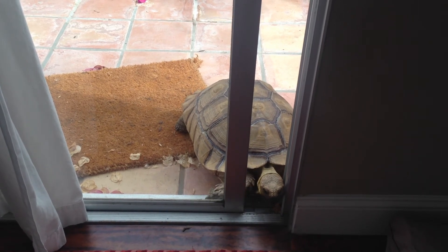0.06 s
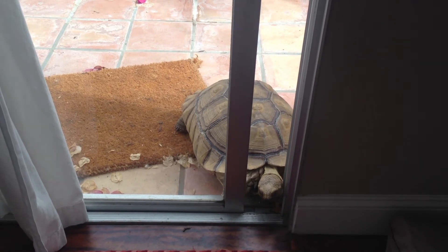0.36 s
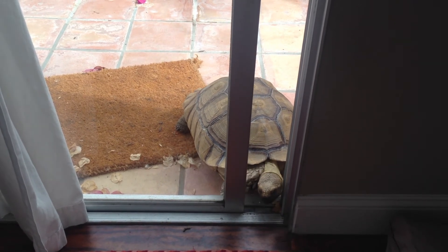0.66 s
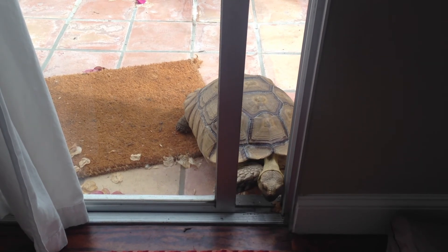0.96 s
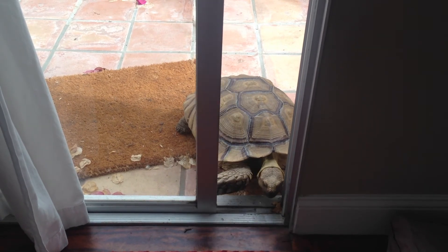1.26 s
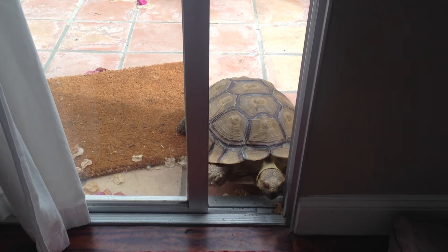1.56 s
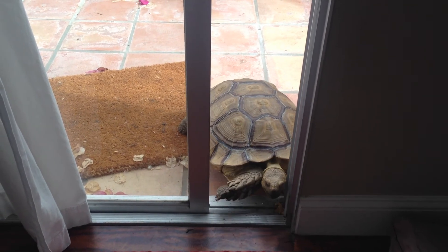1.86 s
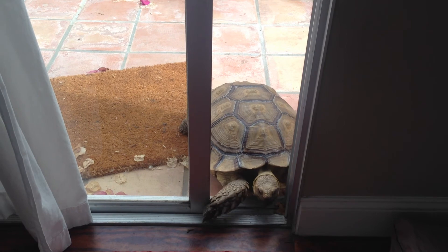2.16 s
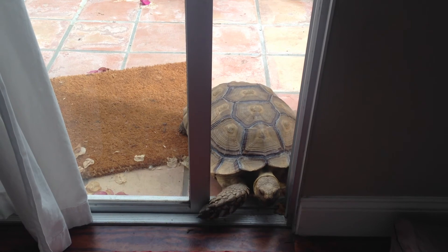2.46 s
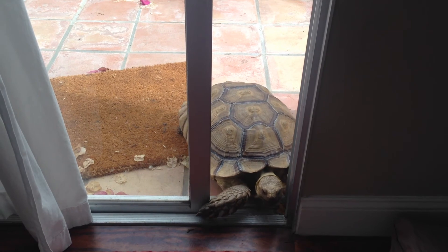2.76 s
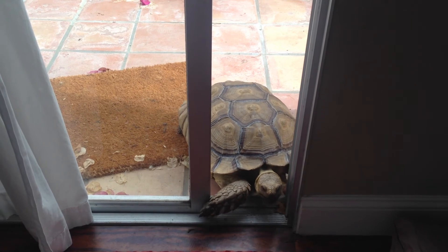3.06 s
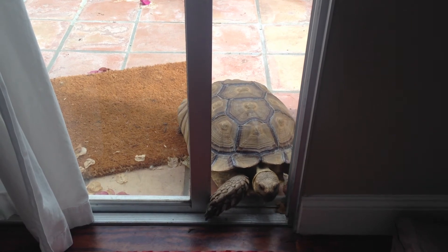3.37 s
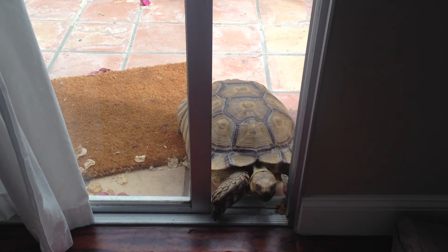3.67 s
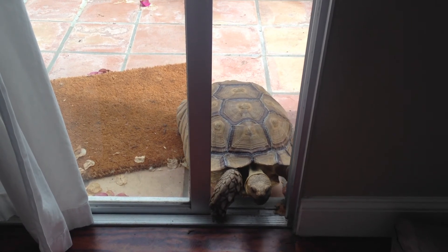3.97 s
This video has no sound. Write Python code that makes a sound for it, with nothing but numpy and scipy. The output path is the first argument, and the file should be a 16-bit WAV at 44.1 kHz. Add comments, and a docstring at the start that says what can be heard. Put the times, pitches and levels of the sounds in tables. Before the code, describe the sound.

A tortoise shoves through a sliding door, heard from a quiet room. Its claws scrape and click on the sill for the first half second. Soft shell thumps and rubbing follow as the door slides, with one faint bird chirp near 0.8 seconds. A sharp knock comes at 2 seconds. Around 3.3 seconds the metal frame briefly groans and clatters loudly, then light bumps and rubs continue until 4 seconds.

```python
"""A tortoise shoves through the gap of a sliding patio door, heard from the quiet room inside.
First its claws scrape and click on the sill. Its shell then thumps the panel and rubs along as the
door slides, and a bird chirps once outside. At two seconds the shell knocks the sill; near three the
claw tips tap it. The metal frame then sticks, groans and clatters against its track, and a last few
bumps and rubs follow."""
import sys
import numpy as np
from scipy import signal
from scipy.fft import rfft, irfft, next_fast_len
from scipy.io import wavfile
from scipy.ndimage import uniform_filter1d

SR = 44100
rng = np.random.default_rng(int(sys.argv[2]) if len(sys.argv) > 2 else 0)


def log_audio(samples):
    """Write samples as a 16-bit WAV file to the path given in sys.argv[1]."""
    # one column per channel
    frames = np.atleast_2d(samples).T
    # limit to full scale, then quantise
    limited = np.clip(frames, -1, 1)
    pcm = np.round(limited * 32767).astype(np.int16)
    wavfile.write(sys.argv[1], SR, pcm)


N = 176400
T = np.arange(N) / SR
HIT_T = T[:SR // 2]  # time axis of one impact

# Bumps of shell and feet. Each row: start in seconds, level in dB, pitch in Hz, rise time in seconds,
# tick level in dB.
PANEL_BUMPS = [(0.287, -48.5, 236, 0.0022, -52.5), (0.311, -51, 161, 0.0063, -58.5),
               (.38, -55.5, 180, 0.0092, -56), (0.593, -55.5, 238, 0.003, -57.5),
               (0.635, -54.5, 239, 0.02, -66), (1.026, -57, 230, 0.0017, -56),
               (1.171, -58.5, 237, 0.0027, -63), (1.376, -53, 173, .012, -70),
               (1.474, -42.5, 222, 0.0014, -49), (1.737, -50, 257, 0.0048, -62.5),
               (1.757, -52, 191, 0.0061, -66), (2.085, -45, 183, 0.0055, -53),
               (2.109, -50.5, 210, 0.0059, -55), (2.254, -39, 172, .013, -63.5),
               (3.23, -45, 168, 0.0043, -78), (3.265, -45, 170, 0.024, -57),
               (3.306, -29.5, 174.7, 0.0086, -63), (3.574, -56, 178, 0.0057, -66),
               (3.951, -50, 165.5, 0.03, -59)]
# Panel modes. Each row: ratio to the pitch, level in dB, decay time in seconds.
PANEL_MODES = [(.73, -8.5, 0.09), (1, 7.5, 0.049), (1.42, -24, 0.14), (2.1, -1, 0.025)]
# Contact tick. Each row: frequency in Hz, gain in dB.
TICK_SPECTRUM = [(80, -17.5), (200, -10.5), (450, 6.5), (750, 2), (1300, 3.5), (4500, -4), (9000, -23.5)]
def panel_bumps():
    """Soft impact: the panel's low modes swell as the push builds, and the contact adds a dull tick."""
    out = np.zeros(N)
    for start, db, hz, rise_s, tick_db in PANEL_BUMPS:
        swell = 1 - np.exp(-(HIT_T / rise_s) ** 2)
        boom = unit(ring(PANEL_MODES, hz) * swell)
        tick = unit(colour(burst(decay_s=.098) * swell, TICK_SPECTRUM))
        add(out, start, amp(db) * boom + amp(tick_db) * tick)
    return out


# Claw slips. Each row: start in seconds, level in dB, pitch in Hz, nominal decay time in seconds.
CLAW_SNAPS = [(0.1743, -58, 4200, 0.012), (0.189, -53.5, 5100, 0.11), (0.278, -39.5, 4870, 0.0083),
              (0.2852, -34, 4500, 0.0083), (.2858, -37.5, 2830, 0.0058), (.2853, -44.5, 1750, 0.007),
              (0.2935, -43.5, 3000, 0.018), (.368, -52.5, 5070, 0.31), (0.402, -51, 4250, 0.018),
              (2.187, -62.5, 4500, 0.019)]
def claw_snaps():
    """Resonance: a claw slipping off the metal edge excites a narrow band, a pitched snap or rasp."""
    out = np.zeros(N)
    for start, db, hz, decay_s in CLAW_SNAPS:
        b, a = signal.iirpeak(hz, Q=2.8, fs=SR)
        slip = signal.lfilter(b, a, signal.lfilter(b, a, burst(decay_s)))
        add(out, start, amp(db) * unit(pass_band(slip, "low", hz=6800, order=3)))
    return out


# Claw strokes. Each row: start in seconds, level in dB, length in seconds.
CLAW_STROKES = [(0.048, -45.5, 0.0034), (0.05, -47.5, 0.041), (.076, -44.5, 0.024), (0.084, -49, 0.0063),
                (0.1214, -42.5, 0.048)]
# Claw on grit. Each row: frequency in Hz, gain in dB.
SCRAPE_SPECTRUM = [(100, -31), (420, -15), (620, 3), (1800, 0.5), (3800, 5), (4800, -4.5), (7500, -5.5),
                   (15000, -28.5)]
def claw_scrapes():
    """Stick-slip friction: each stroke of a claw over grit releases a fading train of clicks."""
    out = np.zeros(N)
    for start, db, length_s in CLAW_STROKES:
        stroke = grit(len(HIT_T)) * np.exp(-(HIT_T / length_s) ** 2)
        add(out, start, amp(db) * unit(colour(stroke, SCRAPE_SPECTRUM)))
    return out


# Shell knock and claw taps. Each row: start in seconds, level before filtering in dB.
SHELL_KNOCKS = [(2.0664, -34)]
CLAW_TAPS = [(2.9896, -69), (3.0093, -68), (3.017, -62), (3.0648, -65)]
# Sill modes. Each row: frequency in Hz, level in dB, decay time in seconds.
SILL_MODES = [(830, 3, .035), (1076, -1, .035), (1850, -1, .028), (3270, -10, .1), (5560, 1, .008)]
# Crack of the sill. Each row: frequency in Hz, gain in dB.
SILL_SPECTRUM = [(150, -14), (450, -7.5), (850, -10.5), (1300, -8), (2700, -5.5), (4000, 2), (5700, 4),
                 (9000, -4), (15000, -20)]
def sill_strikes():
    """Impact excitation: the shell sounds the whole sill; light claw tips raise only its treble."""
    knocks, taps = (blows(strikes, SILL_MODES, SILL_SPECTRUM, crack_db=2.5, crack_s=.019)
                    for strikes in (SHELL_KNOCKS, CLAW_TAPS))
    return knocks + pass_band(taps, "high", hz=4500)


# Bounces on the track. Each row: start in seconds, level in dB.
FRAME_BOUNCES = [(3.2882, -26.5), (3.2932, -18), (3.3005, -17.5), (3.3112, -21.5)]
# Crack of the frame. Each row: frequency in Hz, gain in dB.
FRAME_SPECTRUM = [(90, -23.5), (230, 4.5), (350, -6), (750, -4), (1600, -4.5), (1950, -3), (2750, 0.5),
                  (4200, -4), (6600, -5.5), (8500, -13), (15000, -33)]
# Modes of the metal frame. Each row: frequency in Hz, level in dB, decay time in seconds.
FRAME_MODES = [(1518, -2.5, 0.12), (2386, 0, .055), (2457, -2, 0.044), (2935, -2, 0.078), (2982, 0.5, 0.05),
               (3135, -7, 0.1), (6350, -12, 0.11), (6960, -6, 0.022)]
def frame_clatter():
    """Damped free vibration: the frame bounces on its track, then jams, which chokes its ring."""
    jam_s = 3.317
    choke = fade(t60=.028, hold_s=jam_s, t=T)
    return choke * blows(FRAME_BOUNCES, FRAME_MODES, FRAME_SPECTRUM, crack_db=-8.5, crack_s=.04)


def frame_resonance(contact):
    """Forced vibration: contact noise drives the frame's modes."""
    response = ring(FRAME_MODES, rattle_hz=20)
    return signal.fftconvolve(contact, response / np.linalg.norm(response))[:N]


# Groan of the door. Each row: time in seconds, pitch in Hz, level in dB.
GROAN_CURVE = [(3.214, 565, -59.5), (3.226, 504, -57), (3.265, 490, -75)]
# Grinding in the track. Each row: time in seconds, driving level in dB.
GRIND_CURVE = [(3.12, -73.5), (3.29, -71)]
# Grinding and rubbing noise. Each row: frequency in Hz, gain in dB.
RUB_SPECTRUM = [(60, -14.5), (180, 8), (330, -2.5), (550, 1.5), (1000, -4), (2000, -13.5), (3000, -9.5),
                (5000, -14), (15000, -29.5)]
def frame_sticking():
    """Frictional excitation: the sticking frame grinds in its track and groans at a falling pitch."""
    return frame_resonance(friction(GRIND_CURVE, RUB_SPECTRUM)) + glide(GROAN_CURVE)


# Rubbing and rolling, then track hiss. Each row: time in seconds, level in dB.
RUB_CURVE = [(.55, -83), (.68, -66), (1.0, -69.5), (1.45, -61), (1.62, -70), (2.0, -73.5), (2.32, -68.5),
             (2.5, -78.5), (3.05, -76.5), (3.25, -64.5), (3.48, -70.5), (3.58, -59), (3.76, -73),
             (3.9, -73.5), (3.96, -59.5), (4.1, -78)]
HISS_CURVE = [(.8, -67), (.98, -65), (1.42, -67.5), (1.6, -80), (2.05, -69.5)]
# Track hiss. Each row: frequency in Hz, gain in dB.
HISS_SPECTRUM = [(500, -27), (1500, -7.5), (3200, 5.5), (5000, -2.5), (8000, -5.5), (15000, -21)]
def sliding():
    """Sliding friction: the rubbing shell and rolling door rumble while the track hisses."""
    return friction(RUB_CURVE, RUB_SPECTRUM) + friction(HISS_CURVE, HISS_SPECTRUM)


# Bird's chirp. Each row: time in seconds, pitch in Hz, level in dB.
CHIRP_CURVE = [(.767, 5150, -68), (.778, 5000, -58), (.793, 4950, -57), (.807, 2900, -60),
               (.822, 2400, -63), (.831, 4900, -82), (.838, 4400, -56), (.848, 3300, -63)]
def bird_chirp():
    """Frequency modulation: a bird's whistle sweeps downward twice in quick succession."""
    return glide(CHIRP_CURVE)


# Room response. Each row: frequency in Hz, reverberation time in seconds, gain in dB.
ROOM_BANDS = [(60, .5, -26), (180, 0.27, -4.5), (900, 0.27, -7), (3050, 0.32, -7), (5900, 0.32, -10.5),
              (14000, .25, -7)]
def room(x):
    """Reverberation: diffuse reflections hold briefly, then each band decays at its own rate."""
    hz, t60, db = np.array(ROOM_BANDS).T
    noise_spectrum = rfft(rng.standard_normal(len(HIT_T)))
    log_hz = np.log(np.fft.rfftfreq(len(HIT_T), 1 / SR) + 1)
    tail = 0
    for weights, seconds, gain in zip(np.eye(len(hz)), t60, amp(db)):
        band = irfft(noise_spectrum * np.interp(log_hz, np.log(hz), weights), len(HIT_T))
        envelope = fade(seconds, hold_s=.0053)
        tail = tail + gain * band * envelope / np.linalg.norm(envelope)
    return signal.fftconvolve(x, tail)[:N]


# Room tone. Each row: frequency in Hz, gain in dB.
AIR_SPECTRUM = [(25, -34), (80, -13), (170, -3.5), (330, -6.5), (700, -6.5), (1600, -10.5), (15000, -15.5)]
def still_air():
    """Stationary noise: the faint, even hush of the room."""
    hush = colour(rng.standard_normal(N), AIR_SPECTRUM)
    return amp(-66.5) * hush / hush.std()


def blows(strikes, modes, spectrum, crack_db, crack_s):
    """Impact response: each blow is a broadband crack plus the ringing modes of the struck part."""
    out = np.zeros(N)
    for start, db in strikes:
        tone = amp(-4.5) * unit(ring(modes, rattle_hz=20))
        crack = amp(crack_db) * unit(colour(burst(crack_s), spectrum))
        add(out, start, amp(db) * (tone + crack))
    return out


def ring(modes, pitch=1, rattle_hz=0):
    """Superposition of damped modes; in a loose part, phase drift widens each line to rattle_hz."""
    steps = rng.standard_normal((len(modes), len(HIT_T)))
    drifts = np.cumsum(steps, axis=1) * np.sqrt(2 * np.pi * rattle_hz / SR)
    return sum(amp(db) * np.sin(2 * np.pi * f * pitch * HIT_T + drift) * fade(t60)
               for (f, db, t60), drift in zip(modes, drifts))


def burst(decay_s):
    """Broadband transient: a crowd of short-lived vibrations with an even spectrum."""
    spectrum = rfft(rng.standard_normal(len(HIT_T)) * fade(decay_s))
    whitened = irfft(spectrum / (np.abs(spectrum) + 1e-12), len(HIT_T))
    return whitened * fade(4 * decay_s)


def friction(curve, spectrum, waver_db=1.75):
    """Friction noise: grit under a wavering pressure, silent outside its level curve."""
    times, db = np.array(curve).T
    noise = colour(grit(N), spectrum)
    level_db = np.interp(T, times, db, -np.inf, -np.inf)
    pressure = np.interp(T, np.linspace(0, N / SR, 200), rng.standard_normal(200))
    return noise / noise.std() * amp(level_db + waver_db * pressure)


def grit(count, grains_per_s=3500, spread_db=5):
    """Stick-slip: micro-clicks of random timing, sign and size."""
    slips = rng.random(count) < grains_per_s / SR
    clicks = slips * rng.choice([-1, 1], count) * amp(spread_db * rng.standard_normal(count))
    return clicks / clicks.std()


def glide(curve, jitter=.06):
    """Frequency jitter: a slightly hoarse tone follows a curve of pitch and level."""
    times, hz, db = np.array(curve).T
    waver = uniform_filter1d(rng.standard_normal(N), size=30)
    pitch = np.interp(T, times, hz) * (1 + jitter * waver / waver.std())
    tone = np.sqrt(2) * np.sin(2 * np.pi * np.cumsum(pitch) / SR)
    return tone * amp(np.interp(T, times, db)) * (T > times[0]) * (T < times[-1])


def colour(x, points):
    """Minimum-phase filtering through points of frequency and gain."""
    hz, db = np.array(points, float).T
    n = next_fast_len(2 * len(x))
    log_hz = np.log(np.fft.rfftfreq(n, 1 / SR) + 1)
    cepstrum = irfft(np.log(amp(np.interp(log_hz, np.log(hz), db))), n)
    cepstrum[1:n // 2] *= 2  # folding onto positive time makes the filter causal
    cepstrum[n // 2 + 1:] = 0
    return irfft(rfft(x, n) * np.exp(rfft(cepstrum)), n)[:len(x)]


def pass_band(x, side, hz, order=2):
    """Maximally flat low-pass or high-pass filtering."""
    return signal.sosfilt(signal.butter(order, hz, side, fs=SR, output="sos"), x)


def fade(t60, hold_s=0, t=HIT_T):
    """Exponential decay: after the hold, 60 dB in t60 seconds."""
    return np.exp(-np.log(1000) * np.maximum(t - hold_s, 0) / t60)


def amp(db):
    """Decibels to amplitude ratio."""
    return 10 ** (np.asarray(db) / 20)


def unit(x):
    """Normalisation to the energy of 10 ms at full level."""
    return x / np.sqrt(np.sum(x ** 2) / (SR / 100) + 1e-20)


def add(out, start_s, x):
    """Superposition of x from start_s onward."""
    i = max(int(round(start_s * SR)), 0)
    out[i:i + len(x)] += x[:max(N - i, 0)]


def scene():
    """Direct and reverberant sound of tortoise, door and bird add over still air."""
    contact = claw_snaps() + claw_scrapes() + sliding()
    near = contact + frame_clatter() + frame_sticking() + sill_strikes() + panel_bumps()
    near += amp(-17.5) * frame_resonance(contact)  # sympathetic vibration
    near = pass_band(near, "high", hz=137)  # deep bass below about 137 Hz is removed from the near sound
    bird, air = bird_chirp(), still_air()
    reflections = room(near + amp(9.5) * bird)
    return (near + bird + reflections + air)[None]


def record(dry):
    """Band limiting: a steep low-pass filter removes the highest treble."""
    return signal.sosfilt(signal.ellip(10, .2, 70, 15450, fs=SR, output="sos"), dry)


dry = scene()
out = record(dry)
log_audio(out)
```